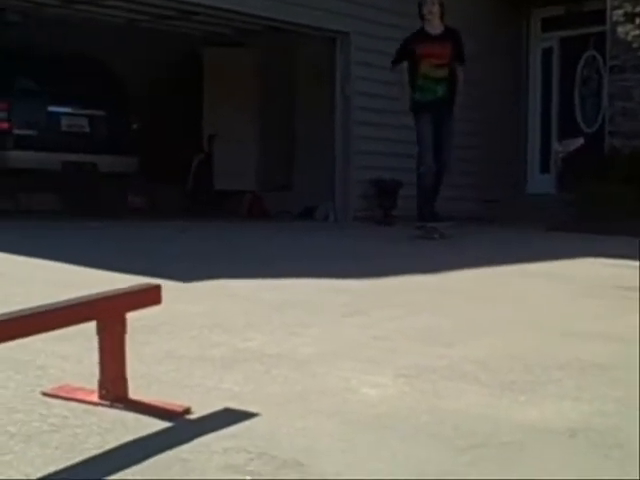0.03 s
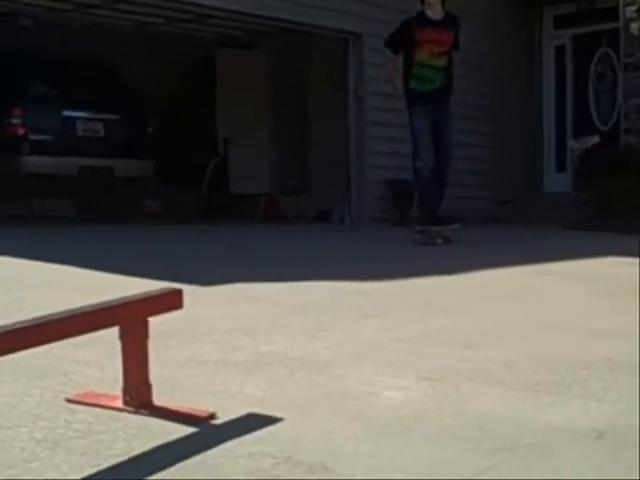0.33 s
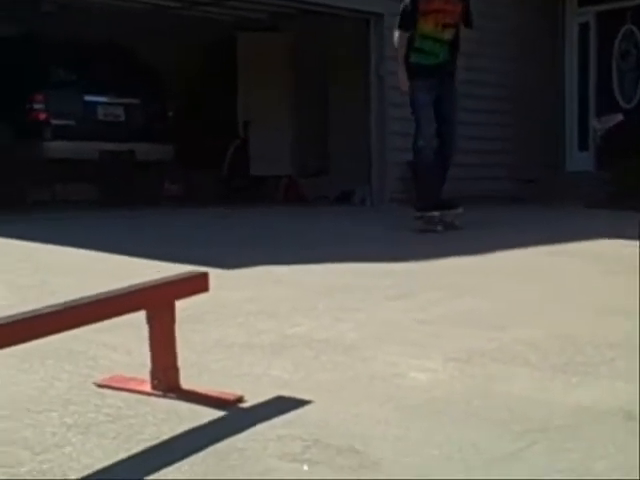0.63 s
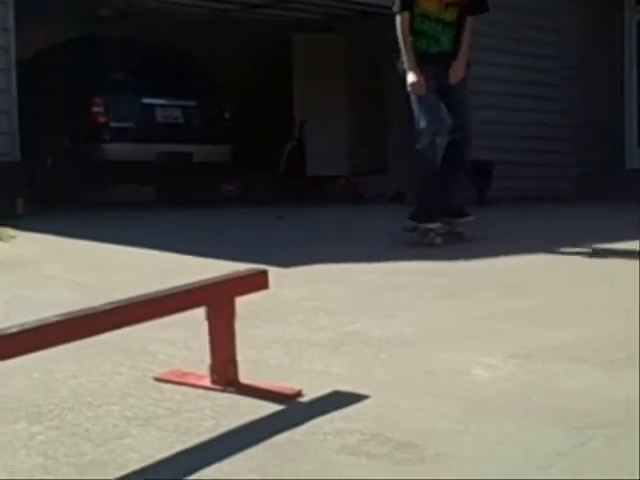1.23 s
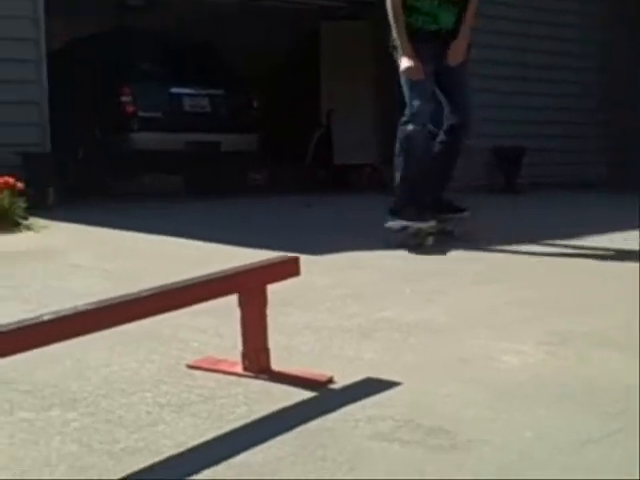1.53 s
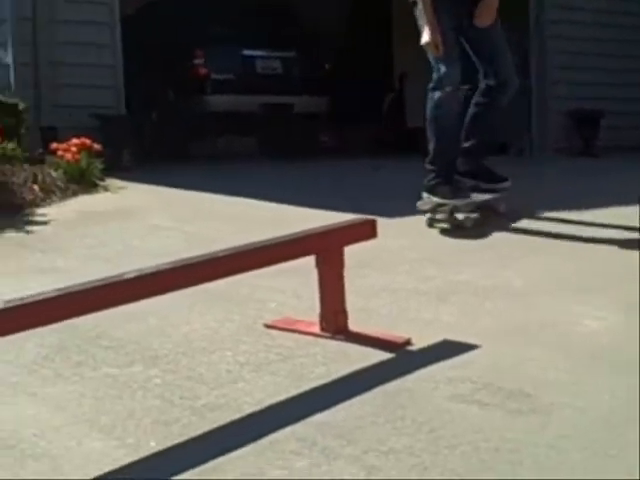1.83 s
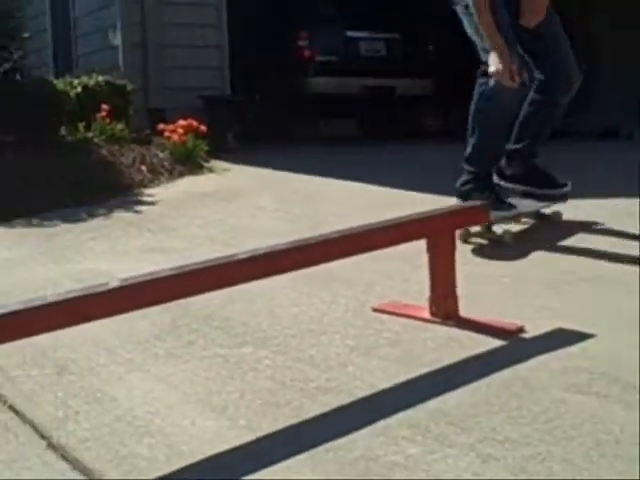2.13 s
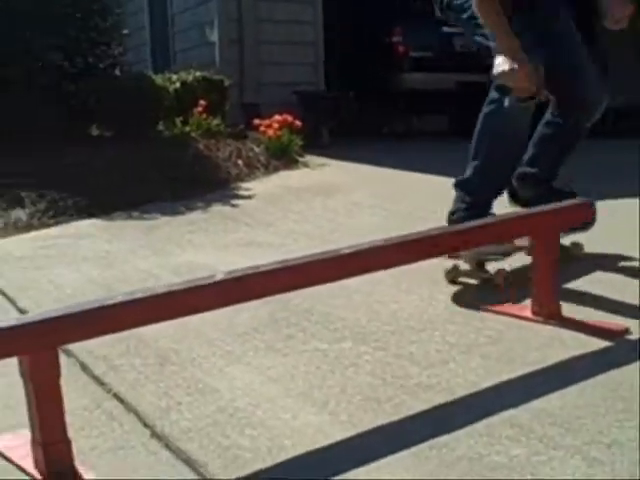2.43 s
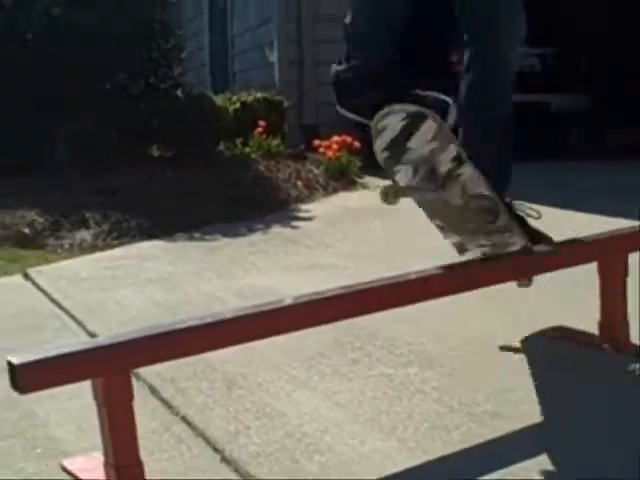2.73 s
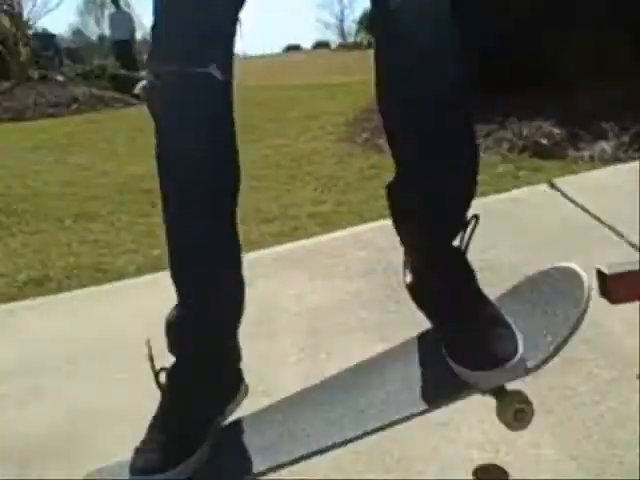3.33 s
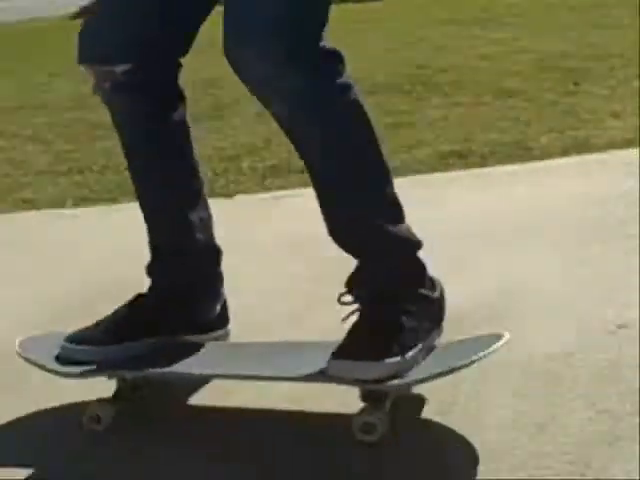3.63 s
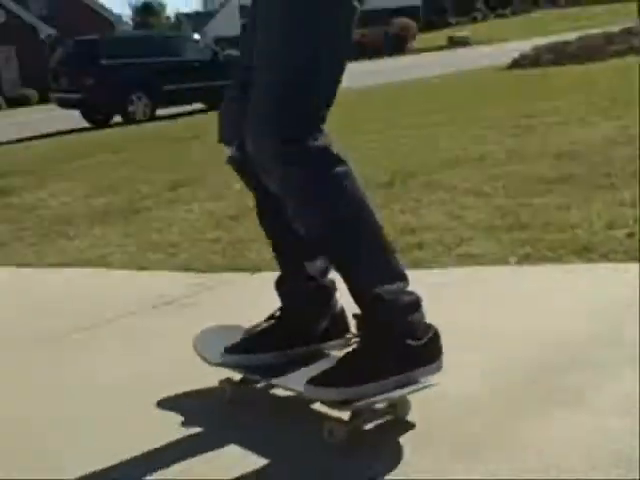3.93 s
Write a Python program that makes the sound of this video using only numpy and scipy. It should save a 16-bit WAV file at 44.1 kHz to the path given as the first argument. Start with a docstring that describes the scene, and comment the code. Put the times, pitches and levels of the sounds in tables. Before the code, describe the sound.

Skateboard wheels approach, then a pop, a short ringing rail grind and a hard landing.

```python
"""Skateboard wheels rumble closer over rough concrete while wind buffets the microphone.
The tail pops on the ground and rings the plywood deck. The trucks clack, slam onto a hollow steel
rail, grind briefly and knock off its end. The board lands, one axle after the other, and rolls on
close by, bearings whirring. A house front answers faintly; the loud blows clip the input."""
import sys
import numpy as np
from scipy import signal
from scipy.fft import rfft, irfft, next_fast_len
from scipy.io import wavfile
from scipy.ndimage import map_coordinates

SR = 44100
rng = np.random.default_rng(int(sys.argv[2]) if len(sys.argv) > 2 else 0)


def generate_wav(sig):
    """Save sig (samples, or channels by samples) to the path in sys.argv[1] as 16-bit PCM at SR."""
    pcm = np.round(np.clip(np.atleast_2d(sig).T, -1, 1) * 32767).astype(np.int16)
    wavfile.write(sys.argv[1], SR, pcm)


N = 176400

# rolling wheels (time [s], level [dB])
ROLL_LEVEL = [(0,-37),(.45,-42.5),(.56,-38),(.88,-39.5),(1.0,-41),(1.28,-42),(1.64,-32),(1.9,-39),(2.06,-27.5),(2.23,-28.5),(2.36,-32.5),(2.62,-25.5),(2.73,-20.5),(2.87,-32.5),(2.96,-33.5),(3.1,-28),(3.54,-43),(3.6,-36),(4,-31)]
# rolling wheels (frequency [Hz], density [dB])
ROLL_SPECTRUM = [(100,6.5),(270,-5.5),(400,-6.5),(480,7.5),(580,-1.5),(690,6),(840,2.5),(1010,-8.5),(1140,6.5),(1270,3),(1430,-6),(1650,-17.5),(1880,-15.5),(2500,-16),(3500,-35),(5000,-23.5),(12000,-31),(14000,-85)]
# grit hiss (time [s], level [dB])
GRIT_LEVEL = [(0,-46.5),(.47,-47.5),(.55,-44.5),(.87,-41),(.95,-46.5),(1.3,-45.5),(1.5,-41.5),(1.64,-32.5),(1.73,-41.5),(1.83,-35),(1.89,-46.5),(2.0,-40.5),(2.08,-34),(2.17,-35),(2.24,-31.5),(2.29,-46.5),(2.66,-39.5),(2.75,-28.5),(2.87,-28.5),(3.0,-32.5),(3.54,-33.5),(3.72,-36),(4,-36)]
# grit hiss (frequency [Hz], density [dB])
GRIT_SPECTRUM = [(500,-1),(1600,9),(2200,3),(3600,4.5),(4800,-3),(6000,-3.5),(6900,-2),(8000,-4),(12500,-5),(13100,-55),(20000,-100)]
# deck drone (time [s], level [dB])
DRONE_LEVEL = [(0,-34.5),(1.27,-42),(1.4,-27),(1.9,-32.5),(2.1,-25),(2.35,-29.5),(2.6,-21.5),(2.87,-22),(2.98,-47),(3.54,-32),(3.62,-23.5),(4,-16)]
# deck drone (frequency [Hz], density [dB])
DRONE_SPECTRUM = [(40,-42),(110,-6),(145,-0.5),(200,-3),(270,-15),(450,-29),(2000,-84)]
# bearing whirr (time [s], level [dB])
WHIRR_LEVEL = [(3.55,-74),(3.6,-29.5),(3.8,-29),(3.88,-23),(4,-27)]
# bearing whirr (frequency [Hz], density [dB])
WHIRR_SPECTRUM = [(150,1),(320,17.5),(520,7),(650,8.5),(1000,-17),(1200,-7),(1450,-1),(1850,-5.5),(2060,-1.5),(2400,-7.5),(2950,-3),(4300,-16),(6000,-10),(6750,-11),(7800,-24),(12000,-35),(14000,-70)]
# stones and seams (time [s], level [dB], relative click [dB])
BUMPS = [(0.288,-29,-0.5),(0.33,-26.5,1.5),(.349,-21.5,-1.5),(0.5057,-27,-6),(.551,-24.5,-13),(0.898,-25.5,-10),(1.2049,-43,14),(1.643,-23,-14),(2.024,-21,-25),(2.215,-29,7),(2.72,-23,7.5),(2.838,-40,-6),(2.859,-13.5,-7),(2.935,-13,-13),(2.952,-17,-4)]

# tail on concrete (time [s], level [dB], relative crack [dB])
POP_HITS = [(2.8781,0,2),(2.886,-7,-7)]
# wheels landing, front axle first (time [s], level [dB], relative crack [dB])
LANDING_HITS = [(3.549,-3.5,-3.5),(3.553,-5.5,-21),(3.5798,1,-20.5),(3.5838,-7.5,-5)]
# free deck (frequency [Hz], level [dB], t60 [s])
FREE_DECK_MODES = [(210,-9,.13),(300,-9,.09),(475,0,.1),(710,-7,.09),(1190,-2,.09),(1270,-4,.12),(1425,-6,.12),(1680,-8,.1),(1885,-5,.09),(2460,-6,.07),(2595,-10,.08),(3480,-11,.08)]
# deck under the rider's weight (frequency [Hz], level [dB], t60 [s])
LOADED_DECK_MODES = [(185,-4,.16),(245,-7,.12),(510,-3,.06),(590,-2,.06),(690,-7,.04),(890,-2,.07),(1110,0,.05),(1230,1,.04),(1500,-7,.035),(2060,-3,.04),(2280,-7,.03),(3250,-13,.025)]
# truck (frequency [Hz], level [dB], t60 [s])
TRUCK_MODES = [(1380,-9,0.05),(1830,-4,.012),(2080,4,0.01),(2440,-4.5,0.024),(3220,-8,0.023),(4530,-10,0.015),(5440,-18,.012)]
# dense plywood modes (frequency [Hz], density [dB])
PLY_SPECTRUM = [(50,-9),(120,12),(230,5),(360,-5),(485,3),(620,-11),(750,4.5),(1000,-13),(1250,-2.5),(1850,-4),(2200,-7),(2500,-7.5),(3500,-15.5),(6000,-15),(12000,-41)]
# their decay (frequency [Hz], t60 [s])
PLY_DECAY = [(150,.17),(500,0.1),(1000,0.17),(1400,0.28),(2200,.16),(5000,0.13)]
# hard contact (frequency [Hz], density [dB])
CRACK_SPECTRUM = [(200,-10),(1000,3),(1400,9.5),(3500,3.5),(7000,-5.5),(11800,-9.5),(12800,-38),(20000,-60)]

# trucks on the rail (time [s], ring [dB], deck knock [dB], crack [dB])
RAIL_HITS = [(3.0652,5,2,3),(3.078,1.5,-6,-1.5),(3.112,-8.5,-15.5,-20),(3.169,-12,-22,-10),(3.292,-3,-25,-13.5),(3.305,-7.5,-7,-11)]
# steel rail (frequency [Hz], level [dB], t60 [s])
RAIL_MODES = [(770,-12,.4),(872,-17,.6),(1215,-10,.35),(2108,0,.55),(2247,-1,.38),(2300,-4,.38),(2462,0,.45),(2602,-6,.48),(3149,-3,.35),(3321,-1,.52),(3402,-1,.62),(3468,-1,.58),(3536,0,.4),(3744,-3,.35),(3887,-1,.38),(3963,-2,.36),(4046,-1,.4),(4143,-3,.35),(4281,-4,.35),(4544,-6,.3),(4791,-7,.3),(4927,-4,.3)]
# dense rail modes (frequency [Hz], density [dB])
SHIMMER_SPECTRUM = [(150,0),(500,-18),(800,-3),(1000,-20),(1250,-10.5),(1880,-10.5),(2200,1.5),(2800,-4),(3800,3.5),(5000,-3),(7000,-9.5),(11600,-15),(12400,-39),(20000,-70)]
# their decay (frequency [Hz], t60 [s])
SHIMMER_DECAY = [(400,0.26),(1500,0.37),(3500,0.29),(7000,0.31),(12000,0.19)]
# trucks scraping (time [s], relative level [dB])
GRIND_LEVEL = [(3.06,-72),(3.07,-9.5),(3.15,-24.5),(3.185,-38),(3.205,-31),(3.26,-24),(3.31,-19.5),(3.34,-60)]
# trucks scraping (frequency [Hz], density [dB])
GRIND_SPECTRUM = [(100,-18),(300,4.5),(1200,-11),(1800,-7.5),(3800,-8),(6000,-12),(11800,-18),(12800,-44),(20000,-70)]

# wind rumble (time [s], level [dB])
WIND_LEVEL = [(0,-23),(.2,-29),(.5,-31),(1.2,-35.5),(2.0,-32.5),(2.3,-27),(2.7,-27),(2.91,-14),(2.99,-34),(3.08,-20),(3.2,-18),(3.5,-18.5),(3.66,-17),(3.8,-17),(3.87,-9.5),(4,-12)]
# wind rumble (frequency [Hz], density [dB])
WIND_SPECTRUM = [(8,-28.5),(28,5),(70,0),(120,-4),(200,-12),(320,-14.5),(550,-34.5),(1200,-31.5),(5000,-64),(14000,-110)]
# single pushes of air (time [s], peak [dB], half width [s])
WIND_BUFFETS = [(0.053,-7,0.0022),(0.125,-9.5,0.0047),(0.352,-12,0.0019),(0.418,-16.5,0.0066),(.835,-14.5,0.0037),(2.291,-7,0.0043),(2.872,-2.5,0.0018),(3.062,-8.5,.003),(3.212,-3.5,.004),(3.635,0.5,.003),(3.929,-3,0.0038)]
# house reverberation (frequency [Hz], t60 [s])
HOUSE_DECAY = [(200,0.14),(1400,0.9),(5000,0.27),(12000,0.27)]
# input treble loss (frequency [Hz], gain [dB])
TREBLE_ROLLOFF = [(12000,0),(12700,-4),(15500,-8)]


def wheels():
    """Rough concrete shakes wheels and deck; loose grit hisses, bearings whirr."""
    roll = coloured(grains(rate_hz=6000, spread_db=1), ROLL_SPECTRUM) * flutter(2.1, rate_hz=39)
    grit = coloured(grains(rate_hz=7000, spread_db=2), GRIT_SPECTRUM) * flutter(2, rate_hz=70)
    drone = noise(DRONE_SPECTRUM, N)
    whirr = coloured(grains(rate_hz=3000, spread_db=3), WHIRR_SPECTRUM) * flutter(2.5, rate_hz=35)
    return (roll * level(ROLL_LEVEL) + grit * level(GRIT_LEVEL)
            + drone * level(DRONE_LEVEL) + whirr * level(WHIRR_LEVEL))


def tail_pop():
    """The tail cracks on the concrete; the deck rings free."""
    out = np.zeros(N)
    for time_s, level_db, crack_db in POP_HITS:
        deck = amp(-3) * (ring(FREE_DECK_MODES) + dense_modes(PLY_SPECTRUM, PLY_DECAY))
        add(out, time_s, amp(level_db) * (deck + amp(crack_db) * crack(t60_s=0.06)))
    return out


def rail_grind():
    """Trucks scrape along the rail; each blow rings the steel and knocks the deck."""
    scrape = coloured(grains(rate_hz=4600, spread_db=0.5), GRIND_SPECTRUM) * flutter(2.7, rate_hz=100)
    out = amp(3) * scrape * level(GRIND_LEVEL)
    for time_s, ring_db, knock_db, crack_db in RAIL_HITS:
        shimmer = dense_modes(SHIMMER_SPECTRUM, SHIMMER_DECAY)
        steel = amp(-9.5) * ring(RAIL_MODES) + amp(-1.5) * shimmer
        knock = amp(knock_db) * ring(LOADED_DECK_MODES)
        add(out, time_s, amp(ring_db) * steel + knock + amp(crack_db) * crack(t60_s=0.093))
    return out


def landing():
    """Wheels slap down; the rider's feet damp the deck."""
    out = np.zeros(N)
    for time_s, level_db, crack_db in LANDING_HITS:
        clatter = amp(-9) * dense_modes(PLY_SPECTRUM, PLY_DECAY) * fade(t60_s=0.096)
        deck = ring(LOADED_DECK_MODES) + clatter
        add(out, time_s, amp(level_db) * (deck + amp(crack_db) * crack(t60_s=0.073)))
    return out


def truck_clack(time_s=3.0262):
    """A truck clacks in mid-air: short ring, faint rattle."""
    out = np.zeros(N)
    add(out, time_s, amp(-3) * (ring(TRUCK_MODES) + amp(-17) * crack(t60_s=0.14)))
    return out


def wheel_ticks():
    """Small bumps click in the wheels and tap the deck."""
    out = np.zeros(N)
    for time_s, level_db, click_db in BUMPS:
        click = noise(GRIT_SPECTRUM) * fade(t60_s=0.017)
        tap = ring(FREE_DECK_MODES, t60_scale=0.22)
        add(out, time_s, amp(level_db) * (tap + amp(click_db) * click))
    return out


def wind():
    """Air on the microphone: lumpy rumble plus single pressure pulses."""
    out = unit_rms(noise(WIND_SPECTRUM, N) * flutter(0.83, rate_hz=21.89)) * level(WIND_LEVEL)
    for time_s, peak_db, half_width_s in WIND_BUFFETS:
        offset = (np.arange(N) / SR - time_s) / half_width_s
        out -= amp(peak_db) * (1 - offset ** 2) * np.exp(-offset ** 2 / 2)
    return out


def house_echo(x, delay_s=0.041):
    """Late, diffuse reflection from the house front and open garage."""
    tail = damped(rng.standard_normal(SR // 2), HOUSE_DECAY)
    delayed = np.pad(x, (round(delay_s * SR), 0))
    return signal.fftconvolve(delayed, tail / np.linalg.norm(tail))[:N]


def ring(modes, t60_scale=1):
    """1 s of struck modes from rms 1; gains and signs vary per blow."""
    t = np.arange(SR) / SR
    freqs_hz, levels_db, t60s_s = np.transpose(modes)
    gains = amp(levels_db + rng.normal(0, 2.1, len(modes))) * rng.choice([-1, 1], len(modes))
    partials = (gain * np.sin(2 * np.pi * hz * t) * fade(t60_s * t60_scale)
                for hz, gain, t60_s in zip(freqs_hz, gains, t60s_s))
    return sum(partials) * np.sqrt(2) / np.linalg.norm(gains)


def dense_modes(spectrum, decay):
    """1 s of struck modes so dense they blur into noise."""
    return damped(noise(spectrum), decay)


def crack(t60_s):
    """Broadband burst of a hard contact."""
    return noise(CRACK_SPECTRUM) * fade(t60_s)


def grains(rate_hz, spread_db):
    """Tiny contacts, random in time and size."""
    impulses = (rng.random(N) < rate_hz / SR) * rng.standard_normal(N)
    return impulses * amp(spread_db * np.minimum(rng.exponential(size=N), np.pi))


def flutter(depth_db, rate_hz):
    """Smooth random gain."""
    knots = rng.standard_normal(int(N * rate_hz / SR) + 4)
    return amp(depth_db * map_coordinates(knots, [np.arange(N) * rate_hz / SR]))


def noise(spectrum, samples=SR):
    """Shaped Gaussian noise, rms 1."""
    return coloured(rng.standard_normal(samples), spectrum)


def coloured(x, spectrum):
    """x shaped by a spectrum, rms 1."""
    return unit_rms(filtered(x, lambda hz: amp(at_hz(spectrum, hz))))


def filtered(x, response):
    """x through the gain response(hz)."""
    size = next_fast_len(len(x) + SR // 10)
    return irfft(rfft(x, size) * response(np.fft.rfftfreq(size, 1 / SR)), size)[:len(x)]


def damped(x, decay):
    """Decay each frequency of x at its own t60."""
    hz, time_s, bins = signal.stft(x, SR, nperseg=256)
    gains = amp(-60 * time_s / at_hz(decay, hz)[:, None])
    return signal.istft(bins * gains, SR)[1][:len(x)]


def fade(t60_s):
    """1 s of exponential decay."""
    return amp(-60 * np.arange(SR) / SR / t60_s)


def level(points):
    """Gain per sample from (time [s], level [dB])."""
    return amp(np.interp(np.arange(N) / SR, *np.transpose(points)))


def at_hz(points, hz):
    """Interpolate (frequency [Hz], value) on a log axis."""
    knots_hz, values = np.transpose(points)
    return np.interp(np.log(hz + 1), np.log(knots_hz + 1), values)


def amp(db):
    """dB to gain."""
    return 10 ** (np.asarray(db) / 20)


def unit_rms(x):
    """Scale to rms 1."""
    return x / np.sqrt(np.mean(x ** 2) + 1e-20)


def add(track, time_s, sound):
    """Mix sound into track at time_s."""
    part = track[round(time_s * SR):][:len(sound)]
    part += sound[:len(part)]


def scene():
    """Board, rail, echo and wind in mono."""
    knocks = tail_pop() + landing() + truck_clack() + wheel_ticks()
    rail = rail_grind()
    rolling = wheels()
    echo = amp(-24.5) * house_echo(knocks + amp(0.5) * rail)
    return (rolling + knocks + rail + echo + wind())[None]


def record(dry):
    """Clip at full scale, dull the top treble, cut at the band limit."""
    limit_hz = 15700
    clipped = np.clip(dry[0], -1, 1)
    return filtered(clipped, lambda hz: amp(at_hz(TREBLE_ROLLOFF, hz)) / (1 + (hz / limit_hz) ** 120))[None]


dry = scene()
out = record(dry)
generate_wav(out)
```